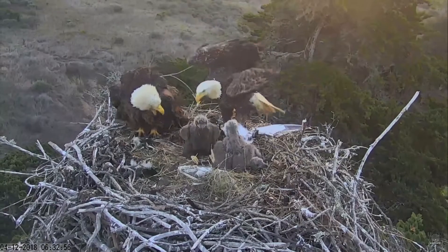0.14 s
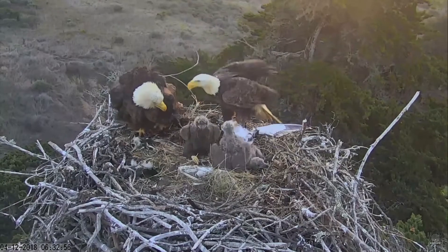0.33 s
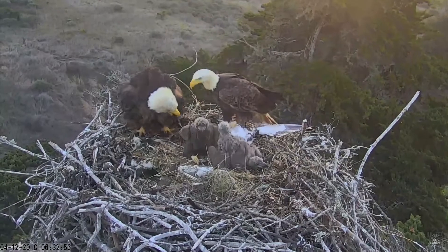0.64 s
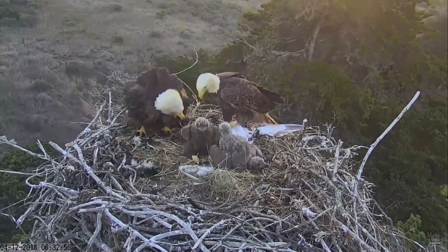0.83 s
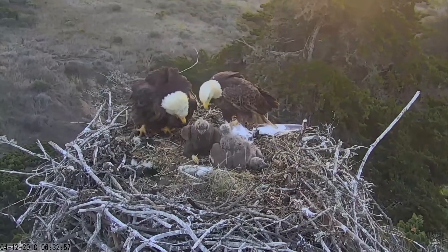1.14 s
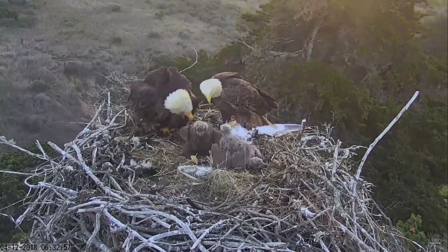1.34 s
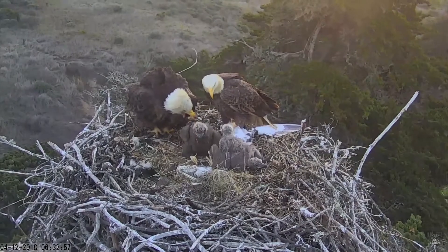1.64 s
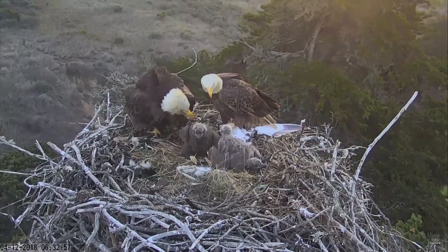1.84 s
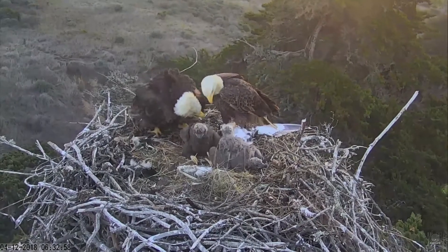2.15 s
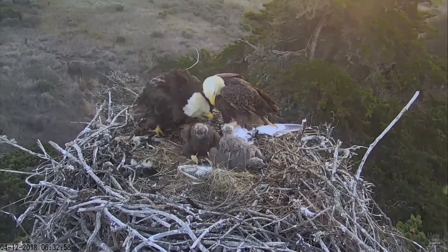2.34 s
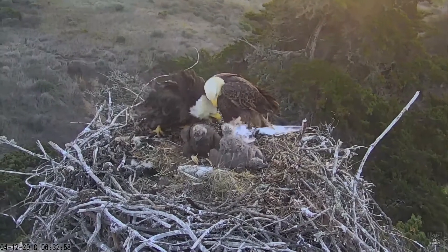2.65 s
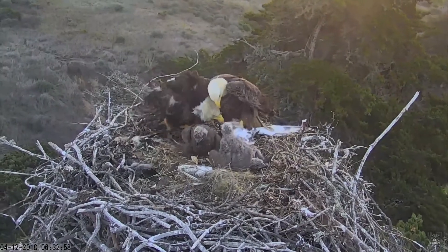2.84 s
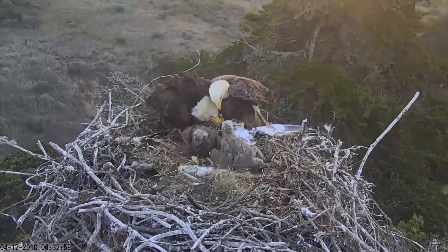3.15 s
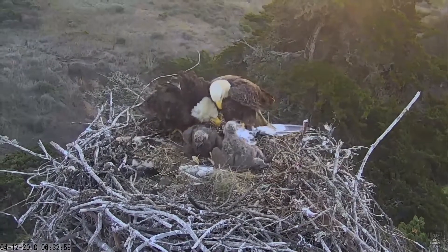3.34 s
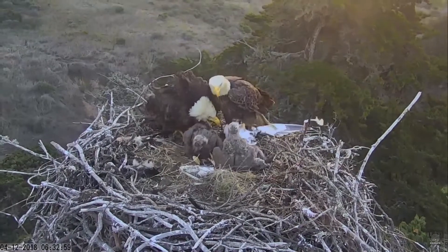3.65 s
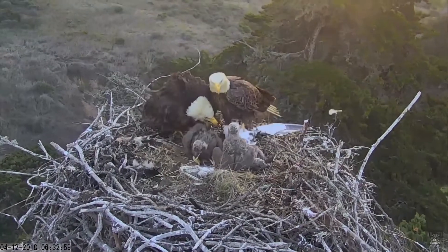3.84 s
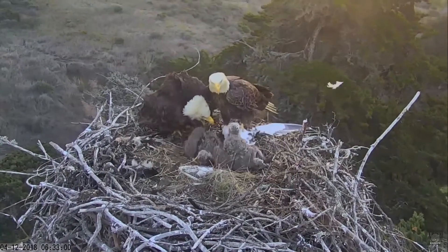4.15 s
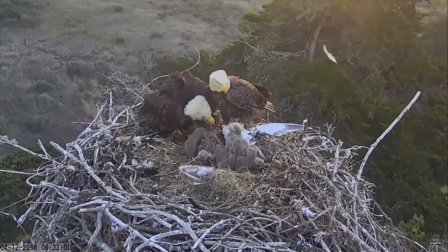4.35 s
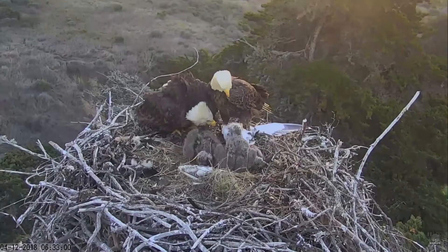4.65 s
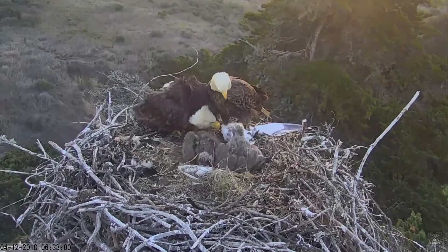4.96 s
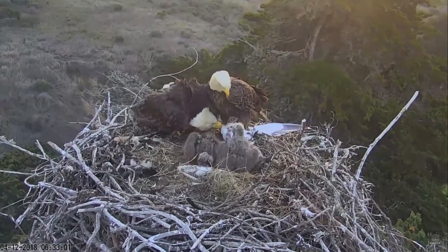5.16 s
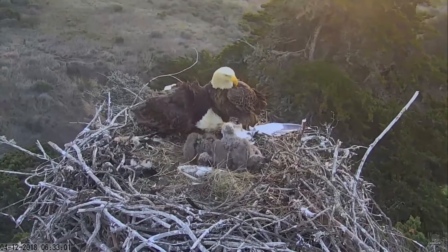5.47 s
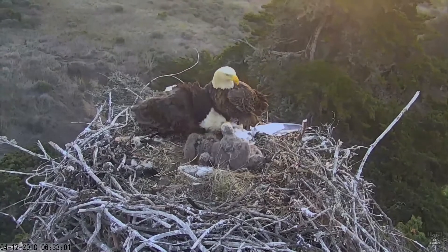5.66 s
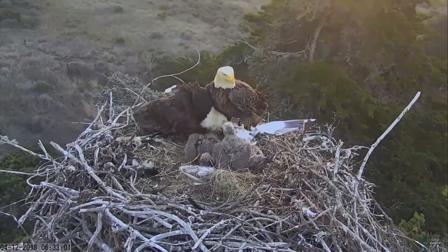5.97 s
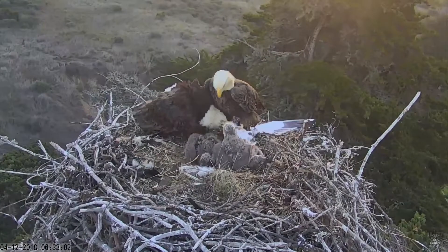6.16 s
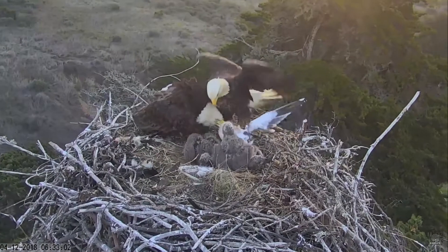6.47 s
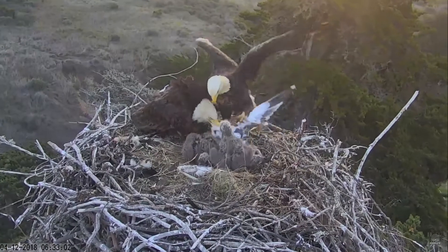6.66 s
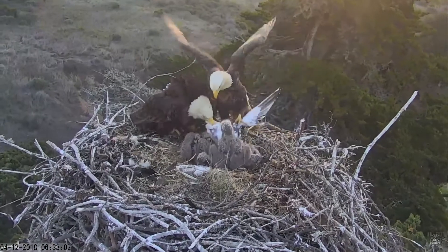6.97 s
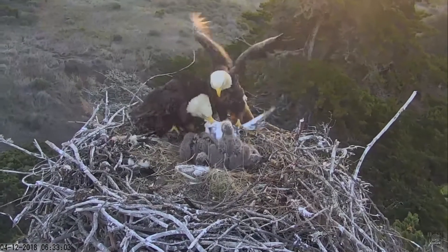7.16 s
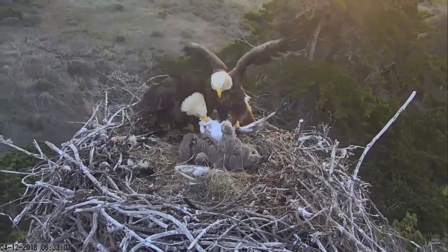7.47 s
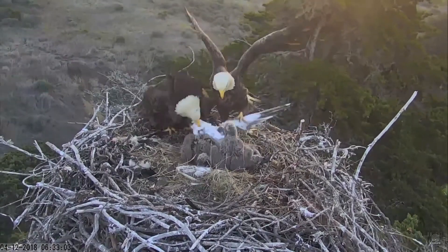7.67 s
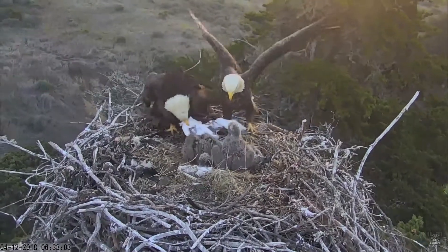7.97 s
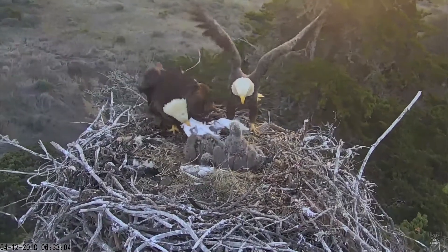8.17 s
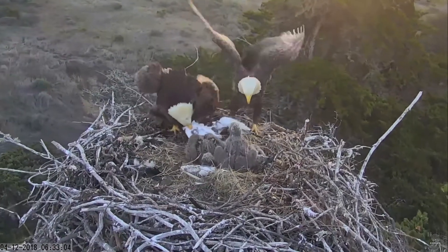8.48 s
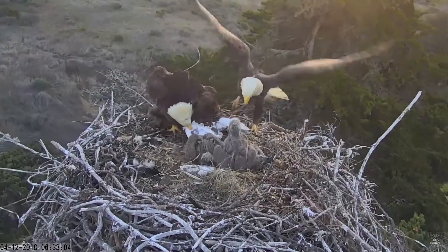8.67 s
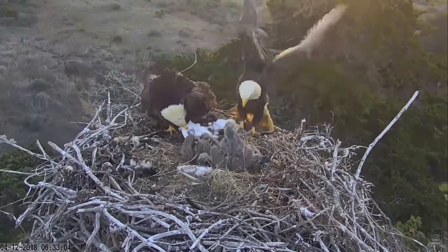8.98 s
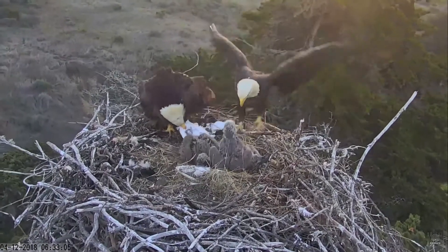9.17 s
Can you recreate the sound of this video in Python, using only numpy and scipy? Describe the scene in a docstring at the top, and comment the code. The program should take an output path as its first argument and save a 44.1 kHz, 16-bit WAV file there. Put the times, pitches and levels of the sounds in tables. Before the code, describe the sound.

An eagle gives thin, rising whistles ending in squeaks, while wind buffets the microphone and frogs peep far away.

```python
"""Thin, rising whistles of bald eagles at a stick nest, turning raspy and breaking off in falling squeaks.
Each is a near sine from the syrinx, whose two sides sometimes sound together and beat.
Wind buffets the nest microphone and swells as one bird spreads its wings.
A fine, dry crackle gives feathers, twigs and the rasp of one call. Frogs peep far away.
The camera whines faintly and its uneven sampling adds thin overtones to the calls."""
import sys
import numpy as np
from scipy import signal
from scipy.fft import rfft, irfft
from scipy.io import wavfile
from scipy.ndimage import uniform_filter1d, map_coordinates

SR = 44100
rng = np.random.default_rng(int(sys.argv[2]) if len(sys.argv) > 2 else 0)


def waveform_to_disk(signal):
    """Save audio, clipped to [-1, 1], as 16-bit WAV at the path in sys.argv[1]."""
    frames = np.transpose(np.atleast_2d(signal))
    scaled = np.clip(frames, -1, 1) * 32767
    samples = np.round(scaled).astype(np.int16)
    wavfile.write(sys.argv[1], SR, samples)


N = 411453
TIME = np.arange(N) / SR

# The colour of rushing air. Each row: frequency in Hz, relative level in dB.
RUSH_SPECTRUM = [(70, -2), (140, 2), (220, 1), (400, -7), (650, -14), (950, -7.5), (1300, -24.5),
                 (1800, -33.5), (2600, -22.5), (3500, -23.5), (4500, -44), (6000, -48.5), (15000, -64)]
# The slow contour of the calls, one list per whistle. Each row: time in seconds, pitch in Hz, level in dB.
CONTOURS = [
    [(0.0, 4620, -20.5), (.08, 4703, -23.5), (.18, 5060, -39), (.237, 4870, -33), (.31, 5090, -38),
     (.365, 5050, -35)],
    [(.72, 3198, -7.5), (.82, 3136, -14.5), (.886, 3150, -16.5), (.915, 3394, -14), (1.162, 3823, -18),
     (1.43, 4470, -31.5), (1.53, 4550, -33.5), (1.675, 5280, -47.5), (1.715, 4930, -40.5),
     (1.79, 4840, -41), (1.912, 4950, -36.5)],
    [(2.233, 3410, -27.5), (2.338, 3413, -21.5), (2.474, 3785, -23), (2.68, 4495, -30), (2.82, 4596, -34),
     (2.945, 5370, -48.5), (3.1, 5370, -54), (3.134, 4950, -34), (3.188, 5250, -39)],
    [(3.571, 3375, -23.5), (3.69, 3382, -24), (3.803, 3780, -20), (3.87, 3840, -23.5), (3.94, 4255, -24.5),
     (4.04, 4367, -22.5), (4.17, 4160, -21.5), (4.33, 4296, -20.5), (4.415, 4406, -25), (4.442, 4160, -14),
     (4.457, 4020, -16)],
    [(4.895, 2960, -25), (4.99, 2950, -22.5), (5.04, 3165, -23), (5.18, 3365, -28.5), (5.47, 3827, -18),
     (5.61, 4247, -25.5), (5.8, 4310, -26.5), (5.93, 4580, -33), (6.014, 4200, -28), (6.225, 5310, -46),
     (6.255, 4950, -36)],
    [(6.712, 3195, -27.5), (6.84, 3120, -28.5), (6.96, 3490, -25.5), (7.1, 3950, -42), (7.3, 4130, -28.5),
     (7.42, 4320, -36.5), (7.72, 4304, -30), (7.87, 4270, -21.5), (8.06, 4045, -18), (8.21, 4174, -22),
     (8.24, 4410, -21.5)],
    [(8.778, 2830, -19.5), (8.893, 2796, -26), (8.97, 3110, -20), (9.035, 3000, -22.5), (9.13, 3193, -19),
     (9.23, 3600, -18), (9.33, 4260, -28)],
]


def from_db(db):
    """Decibels to gain."""
    return 10 ** (np.asarray(db) / 20)


def rms_one(x):
    """Scale to unit power."""
    return x / np.sqrt(np.mean(x ** 2) + 1e-20)


def curves(rows):
    """One curve per value column, drawn through rows that begin with a time in seconds."""
    times, *columns = np.transpose(rows)
    return [np.interp(TIME, times, column) for column in columns]


def gate(start, end, edge_s):
    """One between two times, with short ramps."""
    return np.clip(np.minimum(TIME - start, end - TIME) / edge_s + .5, 0, 1)


def bump(peak_s, half_width_s):
    """A bell-shaped swell of height one."""
    return np.exp(-np.minimum(((TIME - peak_s) / half_width_s) ** 2, 30))


def noise(spectrum):
    """Coloured noise of rms 1, falling 24 dB an octave beyond the ends of its spectrum."""
    hz, db = np.transpose(spectrum)
    bins = np.maximum(np.arange(N // 2 + 1) * SR / N, 1)
    skirts_db = -24 * np.abs(np.log2(bins / np.clip(bins, hz[0], hz[-1])))
    gain = from_db(np.interp(np.log(bins), np.log(hz), db) + skirts_db)
    return rms_one(irfft(rfft(rng.standard_normal(N)) * gain, N))


def flutter(rate_hz):
    """Random wandering up to about the given rate, rms 1."""
    lowpass = signal.butter(2, rate_hz, fs=SR, output="sos")
    return rms_one(signal.sosfilt(lowpass, rng.standard_normal(N)))


def frogs(chorus_db, peep_hz=2745, peeps_per_s=8.14, first_db=-43.5, growth_db_per_s=2.5):
    """A blurred, throbbing chorus and one nearer frog whose single run of peeps grows louder."""
    times = np.arange(1.022, 3.9, 1 / peeps_per_s)
    levels_db = first_db + growth_db_per_s * (times - times[0]) + 3 * rng.standard_normal(len(times))
    peeps = sum(from_db(db) * bump(s, half_width_s=.014) for s, db in zip(times, levels_db))
    pitch = peep_hz * (1 + 0.0075 * flutter(62))
    voice = np.sqrt(2) * np.sin(2 * np.pi * np.cumsum(pitch) / SR)
    # The colour of the chorus. Each row: frequency in Hz, relative level in dB.
    chorus_spectrum = [(1900, -11), (2300, 1.5), (2750, 1.5), (3100, -4), (3900, -20.5)]
    return peeps * voice + from_db(chorus_db + 1.05 * flutter(9.5)) * noise(chorus_spectrum)


def valley():
    """The bed: frogs, and distant air with a low rumble and a hollow ring near 1 kHz."""
    # Its slow swells. Each row: time in seconds, air in dB, frog chorus in dB.
    swells = [(0, -41.5, -49), (.6, -43, -49), (1.3, -38.5, -45.5), (2.2, -38, -43.5), (3.2, -36.5, -39.5),
              (4.3, -35.5, -37.5), (5.4, -36, -43), (6.5, -35, -41.5), (7.5, -27.5, -34.5),
              (8.4, -24.5, -32), (9.33, -33, -36.5)]
    # The colour of the distant air. Each row: frequency in Hz, relative level in dB.
    air_spectrum = [(30, 1.5), (80, 2.5), (160, -16.5), (400, -15.5), (650, -9.5), (960, -3), (1300, -14.5),
                    (1800, -24), (2600, -29.5), (3700, -17), (5000, -31), (8000, -42), (15000, -46)]
    air_db, chorus_db = curves(swells)
    return from_db(air_db) * noise(air_spectrum) + frogs(chorus_db)


def wind(rush_trim_db=0.5, lumpy_db=1.5, evenness=0.49):
    """Eddies buffet the microphone housing near 80 Hz while broader turbulence rushes past."""
    # The steady wind. Each row: time in seconds, buffeting in dB, rush in dB before its trim.
    breeze = [(0.0, -39, -47), (0.62, -38, -47), (1.01, -29, -39.5), (1.53, -30.5, -41), (1.82, -21.5, -31),
              (2.13, -34, -41), (2.78, -24, -33), (4.0, -35.5, -43), (5.38, -29.5, -39),
              (5.82, -26.5, -30.5), (7.09, -21.5, -30), (7.4, -20, -22), (7.85, -19, -21.5),
              (8.31, -10, -13), (8.83, -19, -20), (9.33, -13.5, -17.5)]
    # Gusts add their power to it. Each row: peak time and half width in seconds, then the same two levels.
    gusts = [(0.788, 0.045, -24, -30.5), (1.04, 0.14, -28, -37), (1.706, 0.048, -21.5, -24),
             (1.906, .1, -25, -31.5), (2.73, .06, -25, -27.5), (2.856, 0.037, -21.5, -26),
             (3.28, .07, -21.5, -31.5), (3.56, 0.043, -22.5, -40), (4.699, 0.084, -26, -38.5),
             (4.942, 0.048, -27.5, -39), (5.52, 0.059, -22, -41), (5.871, 0.095, -17.5, -28),
             (6.222, 0.11, -21, -32.5), (6.65, 0.056, -22.5, -29.5), (7.293, 0.076, -12.5, -18),
             (7.52, 0.065, -14, -20.5), (7.848, 0.045, -16.5, -23), (8.113, 0.062, -9, -19),
             (8.5, 0.067, -16.5, -16)]
    # The colour of the buffeting. Each row: frequency in Hz, relative level in dB.
    buffet_spectrum = [(20, -18), (45, -11.5), (62, 0), (85, 0), (110, -2.5), (150, -19.5), (300, -47)]
    power = from_db(curves(breeze)) ** 2
    for s, half_width, buffet_db, rush_db in gusts:
        power = power + from_db([[buffet_db], [rush_db]]) ** 2 * bump(s, half_width)
    buffet_db, rush_db = 10 * np.log10(power)
    eddies = noise(buffet_spectrum)
    local_power = uniform_filter1d(eddies ** 2, size=2200)
    eddies = rms_one(eddies / local_power ** (evenness / 2))   # partly level out the rumble
    rush = noise(RUSH_SPECTRUM) * from_db(rush_db + rush_trim_db + lumpy_db * flutter(27.0))
    return eddies * from_db(buffet_db) + rush


def thumps():
    """A sharp eddy strikes the housing and is gone: a burst of the low end of the rush."""
    # Single eddies. Each row: start in seconds, length in seconds, level in dB.
    hits = [(1.673, 0.063, -20.5), (5.845, .06, -23)]
    envelope = sum(from_db(db) * gate(s, s + length, 0.0052) for s, length, db in hits)
    return noise(RUSH_SPECTRUM[:5]) * envelope


def crackle(snaps_per_s=500, clump_db=4, spread_db=3.0, band_hz=(2300, 5000), fizz=0.11):
    """Fine dry crackle: the rasp of the call near 8.1 s, feathers and twigs elsewhere."""
    # The crackle's swells. Each row: time in seconds, level in dB.
    swells = [(0, -60), (6.9, -70), (7.3, -54), (7.75, -51), (8.1, -40), (8.5, -59), (8.75, -56),
              (9.1, -39), (9.33, -48)]
    triggers = rng.random(N) < snaps_per_s * from_db(clump_db * flutter(18)) / SR
    strength = from_db(spread_db * np.minimum(rng.exponential(1, N), 4))
    snaps = triggers * strength * rng.choice([-1, 1], N)
    body = signal.sosfilt(signal.butter(1, band_hz, "band", fs=SR, output="sos"), snaps + 1e-18)
    return from_db(curves(swells)[0]) * rms_one(body + fizz * snaps)


def syrinx(pitch, rough, chaos, tones=1, ceiling=1.36, octave_db=-38):
    """The bird's voice, a near sine with a faint octave; roughness scatters its phase and level."""
    swing = 1 + rough * chaos
    swing = swing / np.maximum(1, np.abs(swing) / ceiling)   # the membrane's swing is bounded
    cycle = np.exp(2j * np.pi * np.cumsum(pitch) / SR) * swing
    return np.sqrt(2) * np.real((cycle + from_db(octave_db) * cycle ** 2) * tones)


def squeaks(chaos, plunge=2.2, swell=1.72, spit_db=-26):
    """The membrane slackens: pitch drops ever faster while the tone flares with a spit of noise."""
    # Falls that end a whistle, at times two-voiced. Each row: start and length in seconds,
    # first and last pitch in Hz, level at the crest in dB, roughness from 0 to 1.
    falls = [(0.37, 0.013, 5000, 2170, -9.5, 0), (0.399, 0.023, 3700, 2490, -24, 0.3),
             (0.395, 0.026, 4250, 4050, -27, 0.5), (0.419, 0.058, 2900, 2540, -40.5, .05),
             (1.913, 0.019, 4700, 2050, -19.5, 0.24), (3.182, 0.024, 5150, 2090, -25, 0.3),
             (3.192, 0.04, 4500, 4250, -31, .6), (3.205, 0.055, 3750, 3150, -26, 0.8),
             (4.450, 0.025, 4080, 2600, -12.5, 0.14), (4.457, 0.0465, 2700, 2394, -24.5, 0.3),
             (6.253, 0.023, 4950, 2140, -19, 0.16), (6.266, 0.044, 3600, 3080, -29, .7),
             (6.291, .028, 4100, 3700, -36, 0.37), (8.237, 0.024, 4150, 2600, -10.5, 0.3)]
    out = np.zeros(N)
    for s, length, from_hz, to_hz, db, rough in falls:
        progress = np.linspace(0, 1, int(length * SR))
        span = slice(int(s * SR), int(s * SR) + len(progress))
        flare = np.sin(np.pi * progress ** swell) ** 2
        tone = syrinx(from_hz + (to_hz - from_hz) * progress ** plunge, rough, chaos[span])
        spit = from_db(spit_db) * rng.standard_normal(N)[span]
        out[span] += from_db(db) * flare * (tone + spit)
    return out


def melody(scoop_peak_s=.031, scoop_shape=1.55, onset_s=.008, accent_s=0.014):
    """Pitch in Hz and level in dB of the whistles: slow contours with scoops, quavers and catches."""
    pitch, level_db = curves([row for call in CONTOURS for row in call])
    # Upward attacks. Each row: start in seconds, first pitch in Hz, overshoot in Hz, accent in dB.
    scoops = [(.718, 3153, 609.7, -3), (2.231, 2850, 440.5, 8.5), (3.569, 2900, 300, 4.5),
              (4.893, 2714, 290, -0.5), (6.711, 2842, 351.7, 1.5), (8.776, 2850, 250.3, -4)]
    for s, start_hz, height_hz, accent_db in scoops:
        span = slice(int((s - .004) * SR), int((s + .25) * SR))
        age = np.maximum(TIME[span] - s, 0)
        rise = (age / scoop_peak_s) ** scoop_shape
        pitch[span] += (start_hz - pitch[span]) * np.exp(-age / onset_s)
        pitch[span] += height_hz * rise * np.exp(1 - rise)
        level_db[span] += accent_db * np.exp(-(age / accent_s) ** 2)
    # Vibrato. Each row: start and end in seconds, cycles per second, half the pitch swing in Hz.
    quavers = [(1.195, 1.62, 5.7, 129.6), (2.906, 3.11, 12.5, 85), (4.049, 4.359, 10.5, 69.5),
               (5.013, 5.565, 8.93, 59.5), (5.59, 6.109, 9.15, 139.4), (7.067, 7.33, 9.37, 60),
               (7.63, 7.88, 10.5, 65), (8.929, 9.266, 7.6, 80)]
    for start, end, per_s, depth_hz in quavers:
        arches = np.abs(np.sin(np.pi * per_s * (TIME - start) + np.pi / 4))   # round crests, sharp dips
        pitch += 2 * depth_hz * (arches - 2 / np.pi) * gate(start, end, 0.0209)
    # The voice catches. Each row: time and half width in seconds, pitch jump in Hz, level change in dB.
    catches = [(2.268, 0.018, 1, -4), (3.163, .013, 149, -11), (5.53, 0.029, -150, -0.5),
               (6.066, 0.0119, 149.5, 0), (6.753, 0.016, 0, -17), (6.89, 0.019, -1, -19),
               (7.5, 0.0352, 90.5, -3), (7.587, .012, 180, -6), (7.614, 0.017, -110, 9.5)]
    for s, half_width, jump_hz, change_db in catches:
        catch = bump(s, half_width)
        pitch += jump_hz * catch
        level_db += change_db * catch
    return pitch, level_db


def whistles(chaos, tremor=0.00279, wobble=.0033, shimmer_db=0.69, clear_rough=0.0078, beat_rough=0.061):
    """The eagle's whistle scoops up, dips and climbs; under strain it rasps or splits into beating tones."""
    # Raspy stretches. Each row: start and end in seconds, added roughness from 0 to 1.
    rasps = [(0.084, 0.1, 0.4), (0.1, 0.14, 0.24), (1.65, 1.75, 0.2), (2.98, 3.13, .2), (3.91, 3.947, 0.35),
             (4.383, 4.43, 0.13), (5.885, 5.975, 0.07), (7.488, 7.803, 0.15), (8.024, 8.16, .45),
             (8.162, 8.248, 0.3)]
    # The other side of the syrinx joins in. Each row: start and end in seconds,
    # pitch offset in Hz, level against the main tone in dB.
    second_voice = [(1.652, 1.71, -480, 4.5), (1.71, 1.918, -370, 1.5), (2.767, 2.826, 270, -8),
                    (3.022, 3.053, -510, 6.5), (5.899, 5.959, -230, -6.5), (8.218, 8.243, -370, -5)]
    rough = clear_rough + sum(depth * gate(start, end, 0.005) for start, end, depth in rasps)
    drifting_time = np.cumsum(1 + 0.029 * flutter(21.2)) / SR
    tones = 1
    for start, end, offset_hz, db in second_voice:
        split = gate(start, end, 0.012)
        beat = np.exp(2j * np.pi * offset_hz * drifting_time)
        # the two sides are coupled, so a weaker third tone lies one more step away
        tones = tones + from_db(db) * split * (beat + 0.49 * beat ** 2)
        rough = rough + beat_rough * split
    pitch, level_db = melody()
    pitch = uniform_filter1d(pitch, size=220) * (1 + tremor * flutter(79) + wobble * flutter(26.3))
    voiced = sum(gate(call[0][0] - .002, call[-1][0] + .006, .003) for call in CONTOURS)
    hoarse = from_db(-18) * rough * np.abs(chaos) * rng.standard_normal(N)
    envelope = voiced * from_db(level_db + shimmer_db * flutter(29))
    return envelope * (syrinx(pitch, rough, chaos, tones) + hoarse)


def scene(rasp_hz=230, hiss_db=-67.5):
    """Valley, wind, nest and eagle at one hissing microphone."""
    chaos = flutter(rasp_hz) + 1j * flutter(rasp_hz)   # the jitter that roughens the voice
    background = valley() + from_db(hiss_db) * rng.standard_normal(N)
    eagle = whistles(chaos) + squeaks(chaos)
    return (background + wind() + thumps() + crackle() + eagle)[None]


def record(dry, ceiling=.57, clock_hz=48000, whine_waver=0.0012, cutoff_hz=15800):
    """The camera rounds the peaks, holds the last tick of a faster clock, whines and cuts the top."""
    # Electronic whine. Each row: frequency in Hz, level in dB.
    whine_tones = [(5663, -66), (9561, -53.5), (13458, -70), (15676, -76)]
    rounded = dry[0] / (1 + (dry[0] / ceiling) ** 8) ** (1 / 8)
    # the timing error is a sawtooth, which mirrors every tone around multiples of the clock difference
    ticks = np.arange(N) * clock_hz // SR * SR / clock_hz
    held = map_coordinates(rounded, [ticks], order=3, mode="nearest")
    whine_time = np.cumsum(1 + whine_waver * flutter(16)) / SR
    whine = sum(np.sqrt(2) * from_db(db) * np.sin(2 * np.pi * hz * whine_time) for hz, db in whine_tones)
    top_cut = signal.ellip(12, .1, 90, cutoff_hz, fs=SR, output="sos")
    return signal.sosfilt(top_cut, held + whine)[None]


dry = scene()
out = record(dry)
waveform_to_disk(out)
```